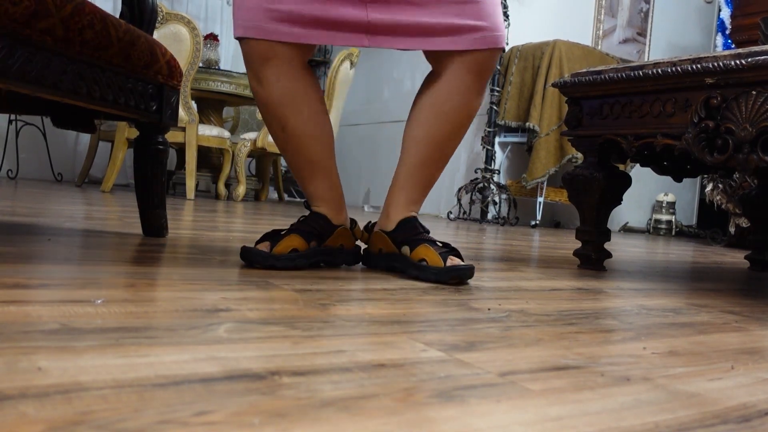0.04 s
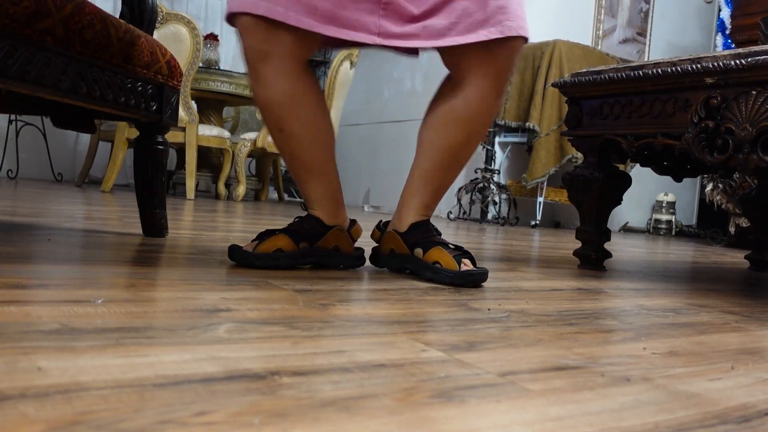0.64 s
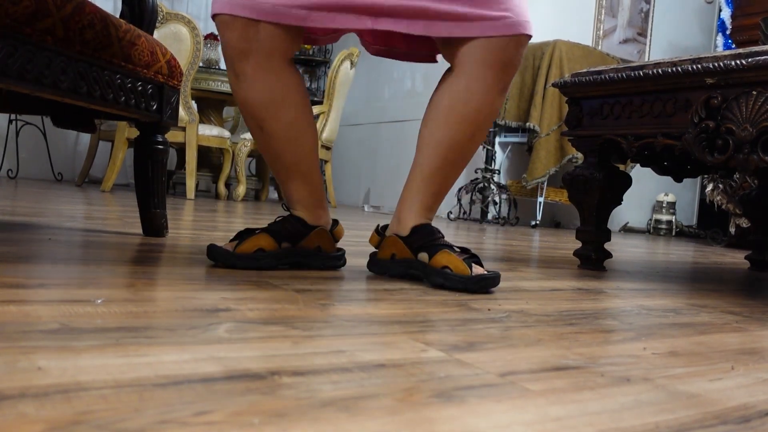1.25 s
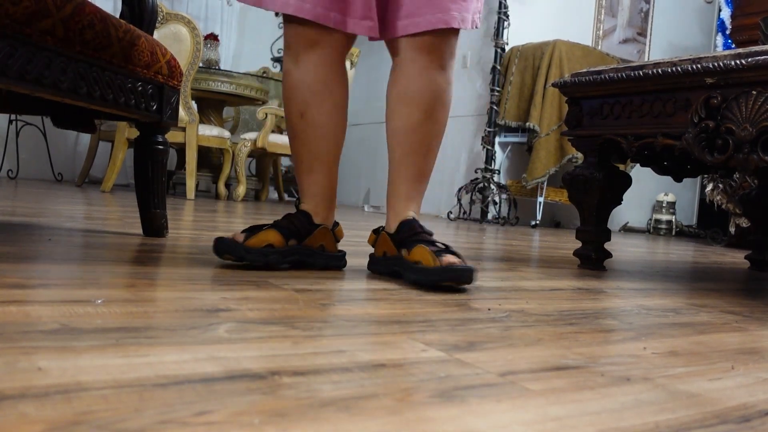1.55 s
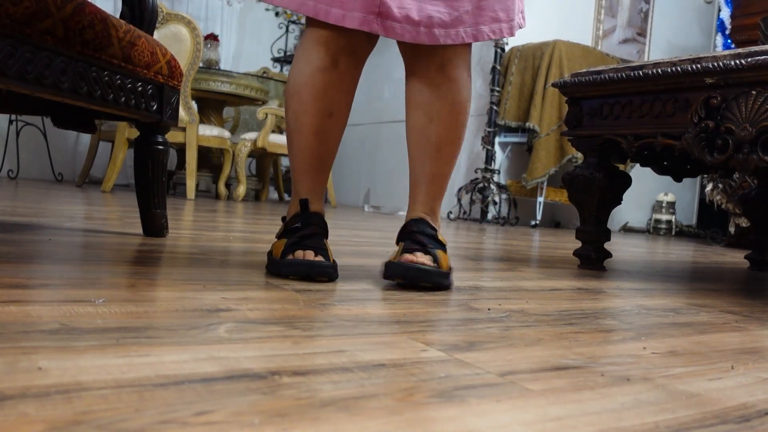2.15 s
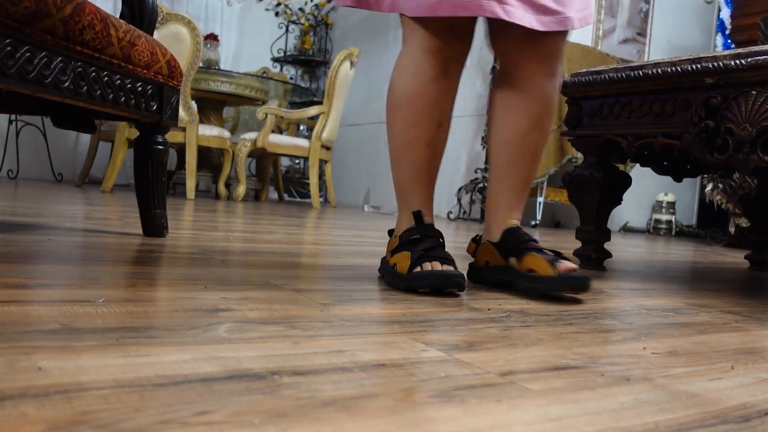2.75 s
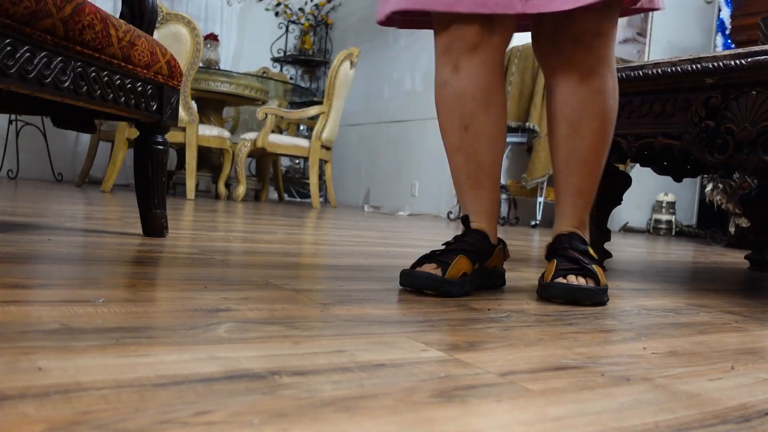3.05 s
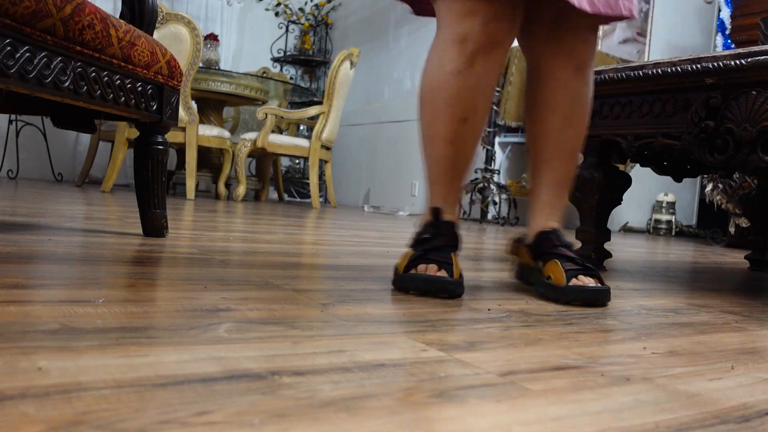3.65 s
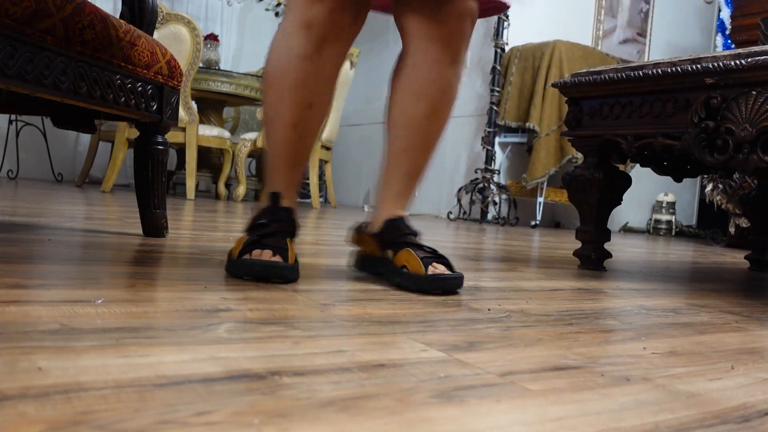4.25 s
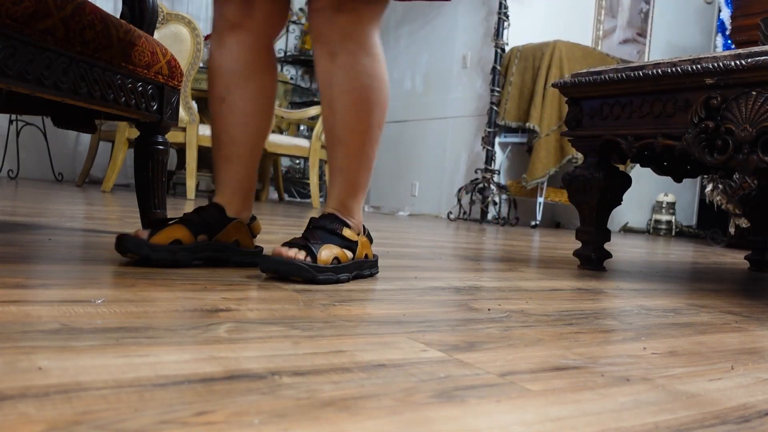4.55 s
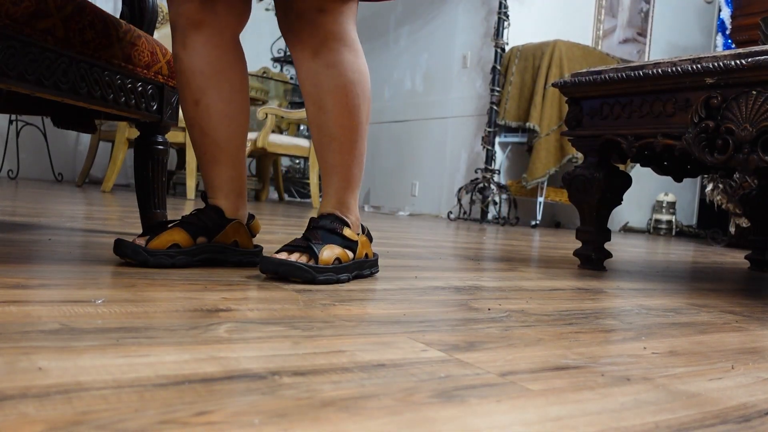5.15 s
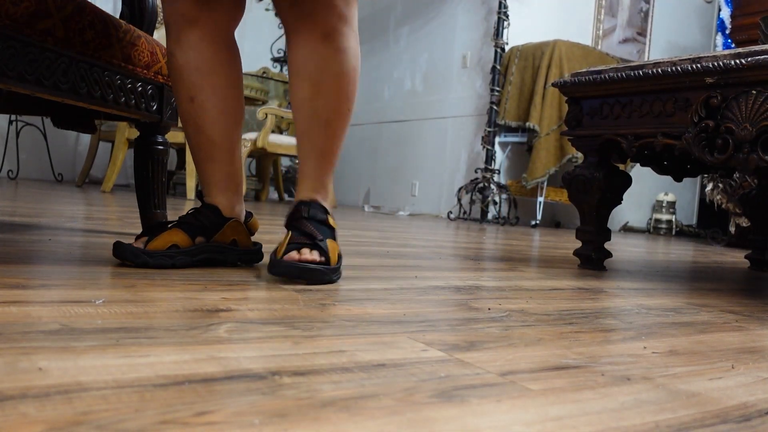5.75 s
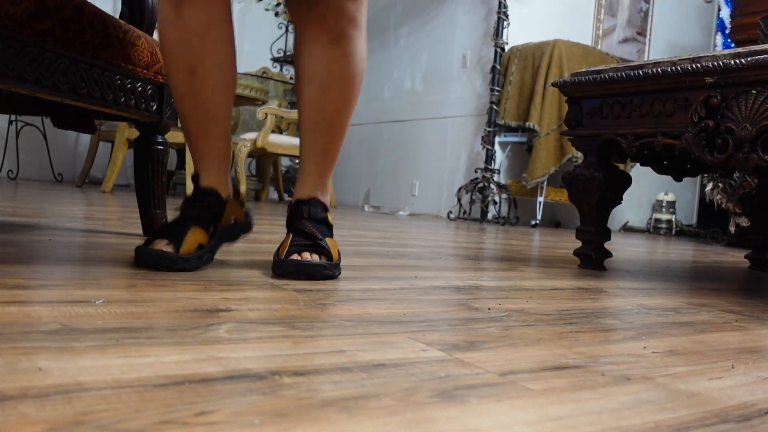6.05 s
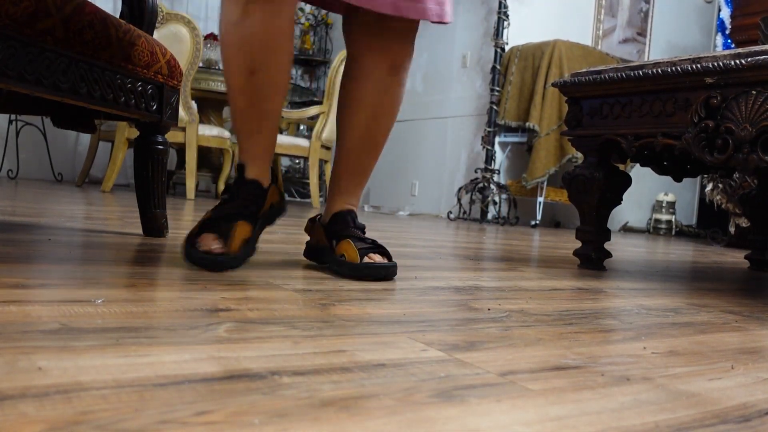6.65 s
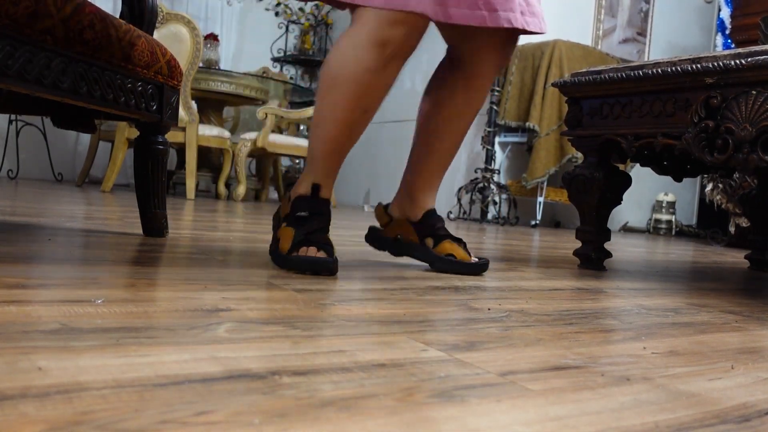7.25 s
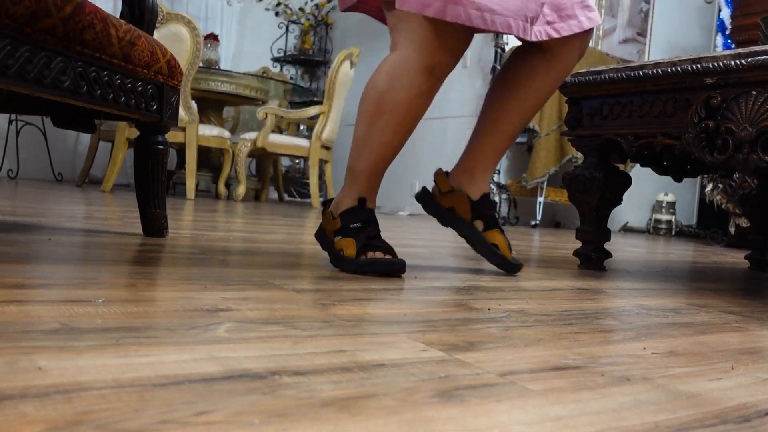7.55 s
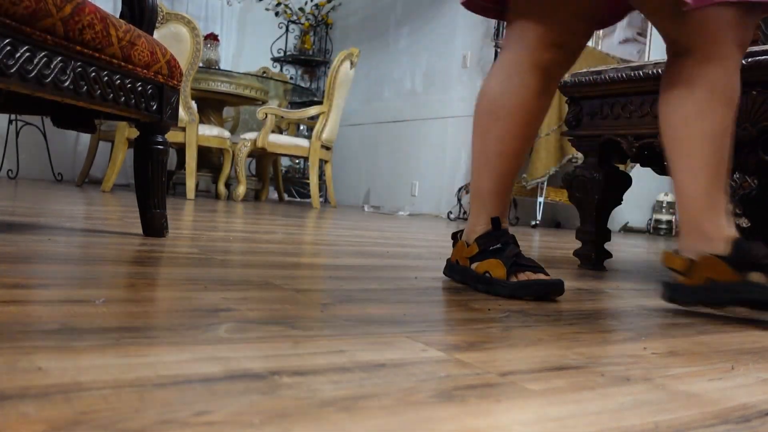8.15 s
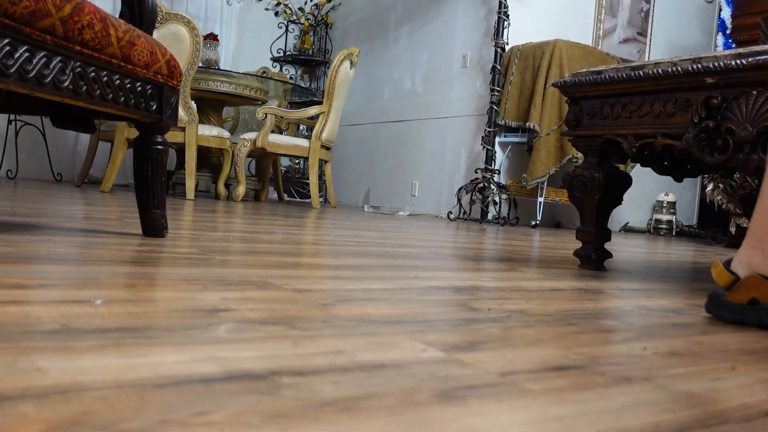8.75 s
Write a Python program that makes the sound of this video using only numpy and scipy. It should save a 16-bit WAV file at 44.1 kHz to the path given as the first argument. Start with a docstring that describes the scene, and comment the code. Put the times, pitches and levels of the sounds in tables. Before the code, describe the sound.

Someone in rubber-soled sandals lands a jump, then scuffs and steps around on laminate boards, thudding in a furnished room.

```python
"""Slaps, clacks and low thuds: someone in chunky rubber sandals jumps, shuffles and steps on laminate.
Each sole slaps the boards and makes them clack and knock; the body's weight follows as a thud.
Between steps the tread drags over the floor and the straps tick. The jump sets a small metal object
tinkling. It is all heard from floor level, in a furnished room with a short echo and a soft hiss."""
import sys
import numpy as np
from scipy import signal
from scipy.fft import rfft, irfft, next_fast_len
from scipy.io import wavfile

SR = 44100
rng = np.random.default_rng(int(sys.argv[2]) if len(sys.argv) > 2 else 0)


def store_pcm(level_fs):
    """Save levels as 16-bit WAV."""
    pcm = np.round(np.clip(level_fs, -1, 1) * 32767).astype(np.int16)
    wavfile.write(sys.argv[1], SR, np.atleast_2d(pcm).T)


N = 392490
TIME = np.arange(N) / SR

# The pitches at which each part rings; narrow ones ring longer: f/Hz, width/Hz, level/dB
KNOCK_RINGS = [(404, 153, -5), (506, 106, -3), (687, 73, -3.5), (798, 97, -0.5)]
CLACK_RINGS = [(1155, 305, -1), (1427, 209, 2), (1752, 340, -1.5), (2370, 540, -9), (2720, 1400, -7.5)]
SLAP_RINGS = [(3570, 2400, -5.5), (4490, 720, 2.5), (5170, 320, -4)]   # retuned for each landing
CRACK_RINGS = [(6700, 900, 17), (10600, 3900, -18)]
# A sole meets the floor: t/s, then knock, clack, slap and crack, each as level/dB
LANDINGS = [(0.514, -40, -37, -54, -65), (0.828, -30, -58, -37, -35), (1.0609, -18.5, -32, -34.5, -35),
            (1.089, -18.5, -32, -21.5, -31), (1.1114, -36, -34, -26, -35), (1.1284, -19, -19, -30, -35),
            (1.15, -24, -22, -24, -55), (1.1523, -19, -18, -38, -59), (1.6411, -34, -43, -31, -45),
            (1.6503, -31, -23.5, -30, -50), (1.7283, -24, -18.5, -27.5, -44), (2.2492, -33, -29, -40, -68),
            (2.4697, -26.5, -18.5, -26, -31), (2.551, -51, -29, -33, -65), (2.576, -38.5, -30.5, -37, -37),
            (2.7575, -38, -31, -34, -56), (2.851, -32.5, -26, -37.5, -60), (3.058, -34, -24, -30, -35),
            (3.7904, -29.5, -19.5, -28.5, -46), (3.8, -25.5, -36, -27.5, -52), (3.8128, -22, -19, -47, -57),
            (3.9298, -33, -28.5, -38, -64), (4.0413, -21.5, -16, -20, -58),
            (4.1022, -28.5, -22.5, -32, -53), (4.3172, -26.5, -26, -26.5, -50),
            (4.3392, -23, -20.5, -38, -45), (4.5443, -30.5, -30.5, -45, -58),
            (4.5834, -30, -15.5, -24.5, -52.5), (5.8532, -36.5, -34, -32, -45),
            (5.8937, -33.5, -38, -33.5, -60), (6.0618, -30, -38, -30, -30.5), (6.0805, -30, -48, -32, -62),
            (6.2307, -49, -31, -26, -32.5), (6.264, -26.5, -24, -30, -60), (6.2874, -49, -27, -32, -26),
            (6.407, -30, -50, -28, -30.5), (6.4499, -31.5, -38, -33, -47), (6.5855, -32.5, -41, -34, -56),
            (6.6163, -36, -32, -32, -51), (6.9132, -34, -28.5, -22.5, -37), (6.938, -27.5, -24, -40, -54),
            (6.956, -52, -27, -27, -36), (7.2869, -51, -27.5, -29.5, -41), (7.3097, -43, -29, -34, -58),
            (7.4651, -19.5, -32.5, -24, -32), (7.6326, -30.5, -35, -25, -52), (7.6679, -26, -21, -30, -52),
            (7.6887, -41, -25, -21, -28), (7.8608, -21.5, -24.5, -30, -30), (7.8878, -45, -36, -27.5, -45),
            (7.9254, -28, -29, -28.5, -33), (8.3043, -43, -21, -39, -63),
            (8.3234, -29.5, -20.5, -27.5, -65), (8.8861, -34.5, -33, -33.5, -37)]
def steps():
    """A sole lands: trapped air and board knock, the laminate clacks, rubber slaps, its edge cracks."""
    out = np.zeros(N)
    for s, knock_db, clack_db, slap_db, crack_db in LANDINGS:
        # landing flat gives more clack and a lower slap; landing on the stiff rim slaps higher
        slap_hz = 4660 - 28 * (clack_db - slap_db)
        tread_rings = np.array(SLAP_RINGS) * [slap_hz / SLAP_RINGS[1][0], 1, 1]
        knock = hit(KNOCK_RINGS, contact_s=0.00035, soft_hz=1130, detune=0.083, attack_s=0.0094,
                    samples=4000, push=2.6, patter_db=5)
        clack = hit(CLACK_RINGS, contact_s=0.00033, soft_hz=2880, detune=0.11, attack_s=0.0061,
                    samples=4000, push=0.82, patter_db=-0.5, patter_s=0.0081)
        slap = hit(tread_rings, contact_s=0.0011, soft_hz=7300, detune=0.015, attack_s=0.0084,
                   samples=4000, patter_db=-7, patter_s=0.013)
        crack = hit(CRACK_RINGS, contact_s=0.0004, soft_hz=11000, detune=0.07, attack_s=0.003,
                    samples=4000, patter_db=-2, patter_s=0.014)
        add(out, s, from_db(knock_db - 0.97) * knock + from_db(clack_db - 1.99) * clack)
        add(out, s, from_db(slap_db - 0.12) * slap + from_db(crack_db - 2.12) * crack)
    return out


# The low pitches of the whole floor and of its panels: f/Hz, width/Hz, level/dB
FLOOR_RINGS = [(45.4, 6, -25), (76, 14, -2.5), (85, 9.2, 0), (98, 12, 1.5), (127.5, 9.2, 8),
               (143.7, 22, 0.5)]
PANEL_RINGS = [(159.7, 37, -2), (189.6, 10.8, 3.5), (211.8, 24, -1), (267, 7.1, -4), (284, 40, -8)]
# Weight comes down on a foot: t/s, then floor, panel and grinding sole, each as level/dB
FOOTFALLS = [(0.831, -47.5, -56, -49), (1.108, -26.5, -30, -24.5), (1.135, -38, -31, -29.5),
             (1.171, -54, -42, -30), (1.655, -40, -35, -33.5), (1.733, -37, -38, -34.5),
             (1.949, -50, -45, -52.5), (2.256, -55, -47, -40), (2.474, -41, -42, -35),
             (2.767, -42.5, -37, -37.5), (2.852, -48, -40, -47), (3.062, -52, -38, -38),
             (3.803, -36.5, -29, -28), (4.048, -36, -38.5, -38), (4.11, -36.5, -34, -46),
             (4.317, -40, -35.5, -51), (4.587, -38.5, -27, -34), (5.9, -34, -34, -37),
             (6.069, -49, -37, -33), (6.251, -37, -32.5, -38), (6.406, -43, -37, -34.5),
             (6.62, -34.5, -39.5, -34), (6.769, -44, -36.5, -40.5), (6.93, -39.5, -38, -29),
             (7.109, -53, -39, -51), (7.299, -46, -36.5, -35.5), (7.47, -38.5, -31.5, -36),
             (7.635, -39, -32.5, -30), (7.692, -39, -61, -33), (7.872, -44, -29.5, -30),
             (7.93, -32.5, -30.5, -37), (8.319, -41, -35.5, -53)]
def thuds():
    """The body's weight follows more slowly and sets the floating floor booming."""
    out = np.zeros(N)
    for s, floor_db, panel_db, _ in FOOTFALLS:
        floor = hit(FLOOR_RINGS, contact_s=0.004, soft_hz=184, detune=0.034, attack_s=0.033, samples=20000)
        panel = hit(PANEL_RINGS, contact_s=0.0035, soft_hz=433, detune=0.054, attack_s=0.044,
                    samples=20000)
        add(out, s, from_db(floor_db) * floor + from_db(panel_db) * panel)
    return from_db(-0.34) * out


# The tone of low grinding and of high brushing: f/Hz, level/dB
GRIND_TONE = [(40, -34), (90, 1), (170, 3.5), (400, -2), (700, -2), (1400, -0.5), (2000, -4.5), (3000, -10),
              (6000, -58)]
BRUSH_TONE = [(1200, -13), (2400, -4.5), (3500, 1.5), (4600, -1), (5500, -3), (7000, -8.5), (9000, -17.5),
              (12000, -24.5), (15500, -39)]
def scuffs():
    """A sole with weight on it grinds on the boards; a light one brushes, rasps and snags."""
    grind_strength, brush_strength = sole_motion()
    grind = friction(GRIND_TONE, catches_per_s=900, catch_db=3, smooth=0.85, judder_db=2.5)
    brush = friction(BRUSH_TONE, catches_per_s=2200, catch_db=3.5, smooth=1, judder_db=2)
    rasp = rms_one(resonate(brush, hz=4650, width=790))   # a narrow, bright rasp in the brushing
    snags = friction(BRUSH_TONE, catches_per_s=100, catch_db=5.5, smooth=0, judder_db=-0.5)
    light_scuff = brush + from_db(-12.5) * rasp + from_db(-11.5) * snags
    return from_db(0.55) * grind_strength * grind + brush_strength * light_scuff


# Faint rubbing of straps and soles while the feet are busy: t/s, level/dB
LIGHT_RUBBING = [(0.0, -45.5), (0.87, -50), (1.71, -39), (1.88, -47), (2.15, -50.5), (2.38, -37),
                 (2.92, -50), (3.47, -48.5), (3.92, -40.5), (4.54, -40.5), (4.93, -58.5), (5.3, -70),
                 (5.82, -48), (7.19, -41), (7.49, -41.5), (7.83, -42.5), (8.03, -64), (8.9, -42)]
# A foot slides: fastest at t/s, speeding up/s, slowing down/s, brush level/dB, grind level/dB
SLIDES = [(0.01, 0.12, 0.13, -45, -37.5), (0.51, 0.48, 0.07, -48, -50), (0.78, 0.33, .1, -49.5, -45.5),
          (0.835, 0.095, 0.053, -34, -34), (1.665, 0.093, 0.05, -34, -33.5), (2.2, 0.067, 0.21, -38.5, -45),
          (2.41, 0.22, 0.36, -42.5, -46), (2.68, 0.14, 0.2, -38, -39.5), (3.03, 0.26, 0.19, -38.5, -40),
          (3.73, 0.17, .35, -36.5, -41), (3.9, .06, .12, -50, -47), (4.0, 0.12, .2, -38, -34),
          (4.21, .15, 0.51, -48, -57), (4.34, 0.37, 0.034, -34, -38.5), (4.42, 0.085, 0.14, -41.5, -35),
          (4.56, 0.14, .1, -41.5, -41.5), (5.74, 0.21, 0.44, -45, -44.5), (5.87, 0.038, 0.071, -37, -40),
          (6.29, 0.042, 0.09, -32.5, -32.5), (6.61, 0.13, 0.097, -38, -36.5), (6.76, 0.047, 0.11, -42, -39),
          (7.15, 0.23, 0.12, -40, -38.5), (7.32, 0.11, 0.044, -36.5, -32.5), (8.33, 0.19, 0.22, -43, -39),
          (8.809, 0.033, 0.26, -47.5, -41)]
def sole_motion():
    """How hard the soles grind and brush: light rubbing, footfalls and slides add their power."""
    rub_db = in_time(LIGHT_RUBBING)
    grind_power = from_db(rub_db - 7.5) ** 2
    brush_power = from_db(rub_db - 11.5) ** 2
    # the sole grinds as the weight builds, then comes to rest
    load_s, rest_db_per_s = 0.015, 169
    t = TIME[:SR // 2]
    load = np.minimum(t / load_s, 1) * from_db(-rest_db_per_s * np.maximum(t - load_s, 0))
    for s, _, _, grind_db in FOOTFALLS:
        add(grind_power, s, (from_db(grind_db) * load) ** 2)
        add(brush_power, s, (from_db(grind_db - 5) * load) ** 2)
    swell_db = 18.5   # rise while speeding up, fall while slowing down
    for s, speed_up_s, slow_down_s, brush_db, grind_db in SLIDES:
        t = TIME[max(0, int((s - 2 * speed_up_s) * SR)):int((s + 2 * slow_down_s) * SR)]
        slide = from_db(-swell_db * np.maximum((s - t) / speed_up_s, (t - s) / slow_down_s))
        add(grind_power, t[0], (from_db(grind_db) * slide) ** 2)
        add(brush_power, t[0], (from_db(brush_db) * slide) ** 2)
    return np.sqrt(grind_power), np.sqrt(brush_power)


# A strap's broad, short rings: f/Hz, width/Hz, level/dB
STRAP_RINGS = [(2970, 2600, -2.5), (4230, 1530, 5.5)]
# Straps and tread bend: t/s, clack level/dB, snap level/dB
FLEXES = [(0.1567, -42, -41), (0.1816, -42, -45), (0.232, -43, -36.5), (0.2619, -43.5, -41),
          (0.369, -42, -48), (0.6436, -46, -45), (0.7043, -44, -34), (1.4317, -39.5, -40.5),
          (1.525, -39, -33), (1.7006, -32, -35), (2.0654, -36.5, -43), (2.875, -50, -34.5),
          (3.191, -46, -34), (3.2168, -35, -28.5), (3.366, -45.5, -44), (3.4581, -50, -43),
          (3.4893, -39, -36), (3.59, -40.5, -42), (4.1627, -36, -35), (4.6989, -35, -38), (4.869, -53, -45),
          (5.342, -48, -47), (5.4108, -36.5, -44.5), (5.482, -37.5, -34.5), (5.6487, -36, -39),
          (5.7097, -33, -32.5), (6.7404, -41, -35), (7.2433, -54, -30.5), (8.1641, -44, -41.5),
          (8.2363, -42, -28), (8.2724, -39, -34), (8.6136, -47.5, -48), (8.626, -48, -42.5),
          (8.7416, -40.5, -40), (8.792, -40.5, -43), (8.8563, -37, -41)]
def ticks():
    """Straps and tread let go in tiny dry snaps as the foot bends."""
    out = np.zeros(N)
    for s, clack_db, snap_db in FLEXES:
        knock = hit(KNOCK_RINGS, contact_s=0.00049, soft_hz=1390, detune=0.19, attack_s=0.01,
                    samples=2000, push=0.45)
        clack = hit(CLACK_RINGS, contact_s=0.000091, soft_hz=3800, detune=0.12, attack_s=0.0069,
                    samples=2000, push=0.83, patter_db=2, patter_s=0.0088)
        snap = hit(STRAP_RINGS, contact_s=0.00026, soft_hz=7300, detune=0.13, attack_s=0.0053,
                   samples=2000, patter_db=1.5, patter_s=0.0044)
        crack = hit(CRACK_RINGS, contact_s=0.00015, soft_hz=13000, detune=0.12, attack_s=0.0025,
                    samples=2000, patter_db=-9.5, patter_s=0.0065)
        add(out, s, from_db(clack_db - 9.15) * knock + from_db(clack_db - 0.35) * clack)
        add(out, s, from_db(snap_db - 1.15) * snap + from_db(snap_db - 7.65) * crack)
    return lowpass(out, hz=11000, order=1)   # webbing and rubber are too soft to sound glassy


def creaks(snaps_per_s=24):
    """Working straps give off a sparse, random crackle of much smaller snaps."""
    out = np.zeros(N)
    rub_db = in_time(LIGHT_RUBBING)
    gap_chance, sizes = rng.random((400, 2)).T
    gaps_s = -np.log(1 - gap_chance) / snaps_per_s
    for s, size in zip(np.cumsum(gaps_s), sizes):
        if s < TIME[-1]:
            db = rub_db[int(s * SR)] - 9 + 15 * size
            snap = hit(STRAP_RINGS, contact_s=0.00018, soft_hz=11000, detune=0.18, attack_s=0.0028,
                       samples=600)
            add(out, s, from_db(db) * snap)
    return out


# The tones of a small metal object: f/Hz, relative level/dB, time to fade by 60 dB/s
METAL_TONES = [(4440, -4, 2.2), (4760, -4, 2.4), (8204, -10, 0.58), (8340, -5, .36), (9000, -2, 0.38),
               (9400, -13, 0.22), (9981, -10, .25), (10230, -9, 1.2), (11200, -10, .25), (12210, -7, 0.22),
               (12820, -15, .3), (13050, -11, .3), (13750, -11, .24), (14050, -19, .3)]
def tinkle(start_s=1.247, level_db=-52):
    """The jump shakes a small metal object: thin high tones ring, and the lowest hang on."""
    out = np.zeros(N)
    for hz, db, fade_s in METAL_TONES:
        t = TIME[:int(fade_s * SR)]
        add(out, start_s, from_db(level_db + db - 60 * t / fade_s) * np.sin(2 * np.pi * hz * t))
    return out


def hit(rings, contact_s, soft_hz, detune, attack_s, samples, push=0, patter_db=-60, patter_s=0.022):
    """A smooth push and a burst from the tread's bumps make a part ring; rms 1 over the first attack_s."""
    t = np.arange(samples) / SR
    burst = (t / contact_s) * np.exp(-t / contact_s) * (push + rng.standard_normal(samples))
    # the rest of the sole patters down after the first touch
    taps = (rng.random(samples) < 900 / SR) * rng.choice([-1, 1], samples)
    patter = taps * from_db(patter_db) * np.exp(-t / patter_s)
    force = lowpass(burst + patter + 1e-18, soft_hz)
    # each spot rings at slightly different pitches
    tuning = np.exp(detune * np.clip(rng.standard_normal(len(rings)), -2, 2))
    sound = sum((-1) ** k * from_db(db) * resonate(force, hz * tuning[k], width)
                for k, (hz, width, db) in enumerate(rings))
    return sound / np.sqrt(np.mean(sound[:int(attack_s * SR)] ** 2))


def friction(tone, catches_per_s, catch_db, smooth, judder_db):
    """Rubber catches and slips on the grain: uneven tiny clicks over a smooth rub."""
    sizes = from_db(catch_db * np.minimum(rng.exponential(1, N), 4)) * rng.choice([-1, 1], N)
    catches = rms_one(sizes * (rng.random(N) < catches_per_s / SR))
    rub = catches + smooth * rng.standard_normal(N)
    return colour(rub * from_db(judder_db * drift(per_s=90)), tone)


# Where the feet are: t/s, left minus right level/dB
FOOT_POSITION = [(0, 1.5), (2, 0.6), (3.2, 0.3), (4, 0), (5.5, 2), (6.5, 0.5), (7.6, 0.6), (8.3, -2),
                 (8.9, -3.5)]
def near_sound(feet, width_db=-4, above_hz=9200, lag_s=0.000942):
    """The feet move left and right; the treble differs slightly on each side, widening the sound."""
    sides = np.array([[1], [-1]])
    direct = feet * from_db(in_time(FOOT_POSITION) / 2 * sides)
    treble = feet - lowpass(feet, above_hz, order=1)
    treble_width = from_db(width_db) * np.interp(TIME - lag_s, TIME, treble)
    return direct + treble_width * sides


def room(x, stretches=16, spot_count=5):
    """The echo cycles through a few patterns as the feet move from spot to spot."""
    out = np.zeros((2, N))
    bounds = np.linspace(0, N, stretches + 1).astype(int)
    spots = [echoes() for _ in range(spot_count)]
    for k, (start, end) in enumerate(zip(bounds, bounds[1:])):
        for ear, echo in zip(out, spots[k % spot_count]):
            add(ear, start / SR, signal.fftconvolve(x[start:end], echo))
    return out


# How long the echo lasts: f/Hz, time to fade by 60 dB/s
ECHO_FADE = [(100, 0.52), (400, 0.43), (1500, 0.48), (5000, 0.45), (14000, 0.55)]
# How loud the echo is: f/Hz, level/dB
ECHO_TONE = [(60, -4), (200, -4.5), (600, -7.5), (1500, -3), (5000, -10), (14000, -1.5)]
def echoes(build_s=0.0024):
    """Echoes from furniture and walls thicken, then die away, each band of pitches at its own pace."""
    t = np.arange(SR * 3 // 5) / SR
    edges_hz = np.geomspace(45, 18000, 10)
    tail = 0
    for low, high in zip(edges_hz, edges_hz[1:]):
        hz = np.sqrt(low * high)
        envelope = (1 - np.exp(-(t / build_s) ** 2)) * from_db(-60 * t / at_hz(ECHO_FADE, hz))
        noise = rng.standard_normal((2, len(t))) * envelope / np.linalg.norm(envelope)
        band = signal.sosfilt(signal.butter(2, [low, high], "band", fs=SR, output="sos"), noise)
        tail = tail + from_db(at_hz(ECHO_TONE, hz)) * band
    return spread(*tail)


# The tone of the room's hiss: f/Hz, level/dB
AIR_TONE = [(30, -24), (90, -5.5), (250, 0), (900, -3), (2300, -6.5), (4000, -21.5), (6000, -20),
            (10000, -28.5), (15500, -33)]
def background(air_db=-58.5, whine_db=-69.5, whine_hz=7350, width_hz=340):
    """Quiet room air with a faint high whine."""
    air = spread(*[colour(noise, AIR_TONE) for noise in rng.standard_normal((2, N))])
    whine = resonate(rng.standard_normal((2, N)), whine_hz, width_hz)
    whine = resonate(whine, whine_hz, width_hz)
    return from_db(air_db) * air + from_db(whine_db) * rms_one(whine)


# How alike left and right sound: f/Hz, likeness (1 = the same)
EAR_LIKENESS = [(130, .9995), (300, 0.97), (600, 0.64), (1200, 0.66), (4000, 0.54), (8000, 0.43),
                (14000, .05)]
def spread(mid, side):
    """Two unrelated sounds become one that is all around: alike in the bass, apart in the treble."""
    n = len(mid)
    alike = np.clip(at_hz(EAR_LIKENESS, np.fft.rfftfreq(n, 1 / SR)), 0, 1)
    shared = np.sqrt((1 + alike) / 2) * rfft(mid)
    opposite = np.sqrt((1 - alike) / 2) * rfft(side) * [[1], [-1]]
    return irfft(shared + opposite, n)


def from_db(db):
    return 10 ** (np.asarray(db) / 20)


def rms_one(x):
    """Scale a sound so its average strength (rms) is 1."""
    return x / np.sqrt(np.mean(x ** 2) + 1e-20)


def in_time(points):
    """Read a curve at every sample."""
    return np.interp(TIME, *np.transpose(points))


def at_hz(points, hz):
    """Read a curve at a pitch, with octaves evenly spaced."""
    f, value = np.transpose(points)
    return np.interp(np.log(hz + 1e-9), np.log(f), value)


def add(track, s, sound):
    """Mix a sound in at s seconds."""
    i = max(0, round(s * SR))
    track[i:i + len(sound)] += sound[:max(0, N - i)]


def lowpass(x, hz, order=2):
    return signal.sosfilt(signal.butter(order, hz, fs=SR, output="sos"), x)


def resonate(x, hz, width):
    """Ring at one pitch, with gain 1 at that pitch."""
    r = np.exp(-np.pi * width / SR)
    feedback = [1, -2 * r * np.cos(2 * np.pi * hz / SR), r * r]
    return signal.lfilter(np.array([1, 0, -1]) * (1 - r * r) / 2, feedback, x)


def drift(per_s):
    """A smooth random wobble, rms 1."""
    return rms_one(np.interp(TIME * per_s, np.arange(N // 20), rng.standard_normal(N // 20)))


def colour(x, tone):
    """Shape a sound's bass and treble to a tone curve; rms 1."""
    n = next_fast_len(N)
    gain = from_db(at_hz(tone, np.fft.rfftfreq(n, 1 / SR)))
    return rms_one(irfft(rfft(x, n) * gain, n)[:N])


def scene():
    """The feet move in front of the microphone; the whole floor booms; the room answers."""
    feet = steps() + ticks() + creaks() + scuffs() + tinkle()
    boom = thuds()
    return near_sound(feet) + boom + room(feet + boom) + background()


def record(dry, low_hz=42, top_hz=15800):
    """The microphone drops the deepest bass and the very top."""
    thin = signal.sosfilt(signal.butter(2, low_hz, "high", fs=SR, output="sos"), dry)
    return signal.sosfilt(signal.ellip(10, .1, 80, top_hz, fs=SR, output="sos"), thin)


dry = scene()
out = record(dry)
store_pcm(out)
```